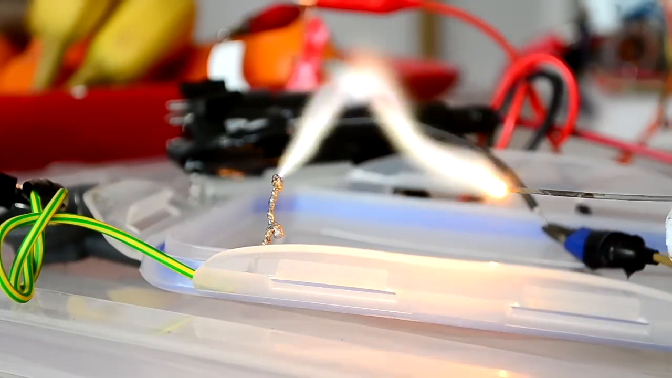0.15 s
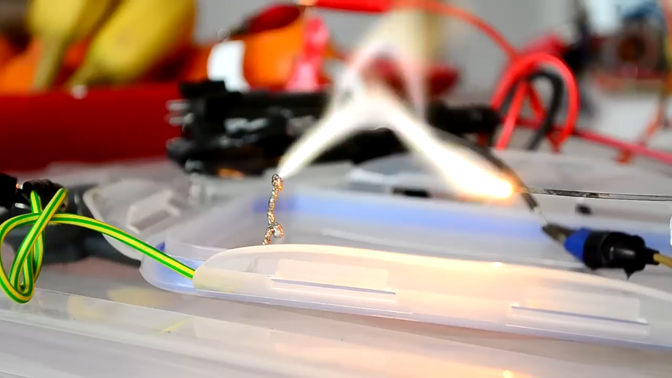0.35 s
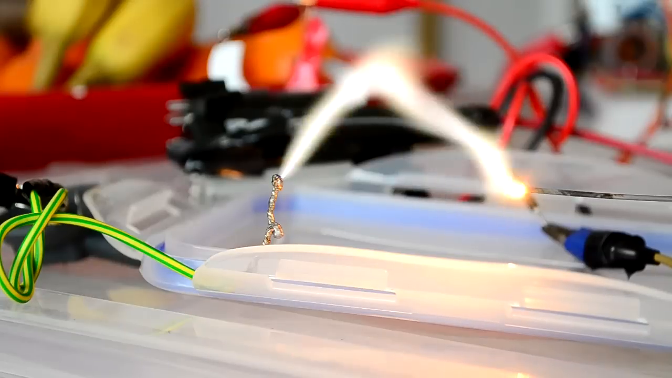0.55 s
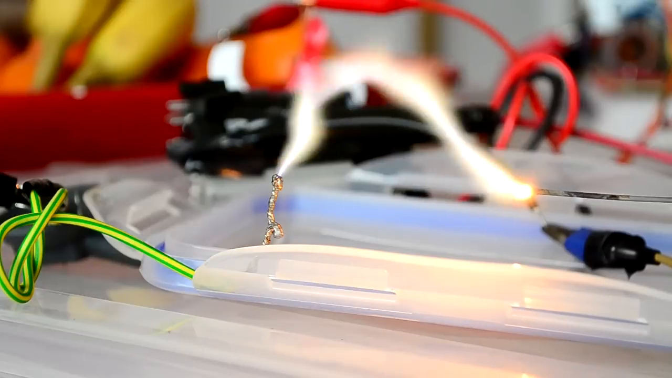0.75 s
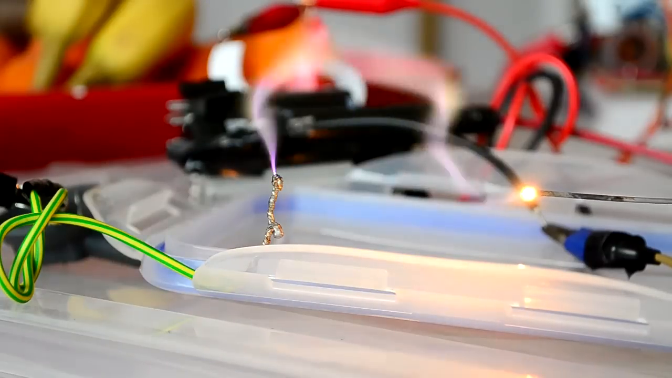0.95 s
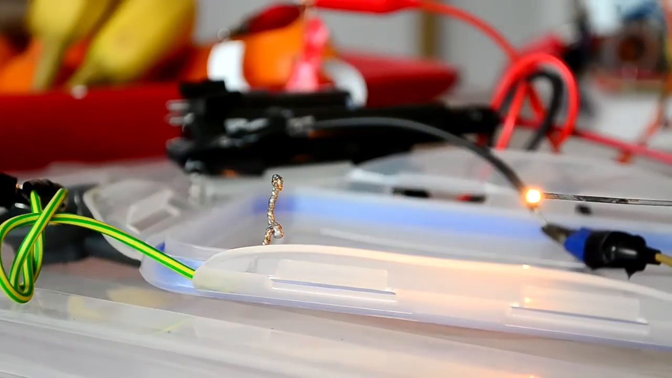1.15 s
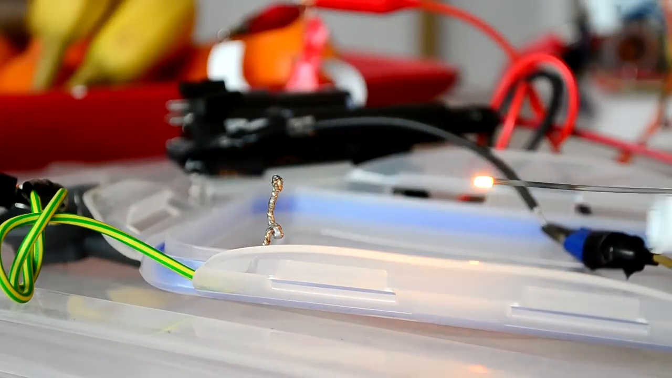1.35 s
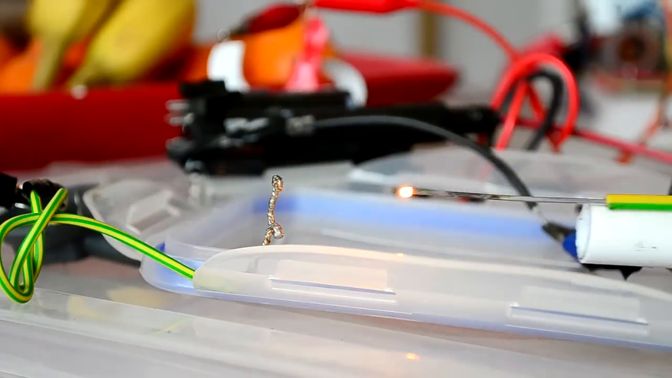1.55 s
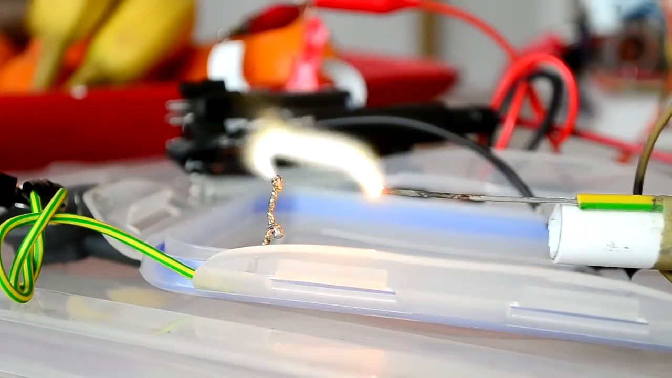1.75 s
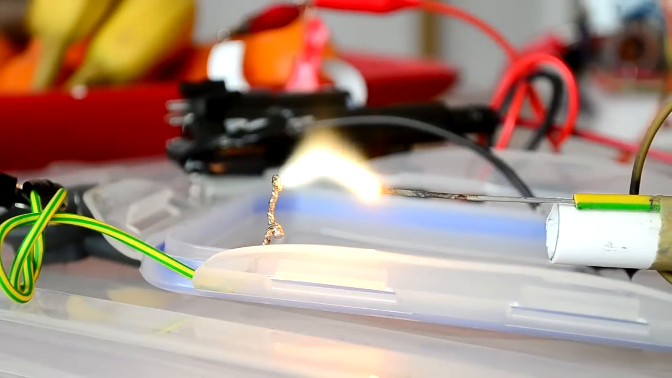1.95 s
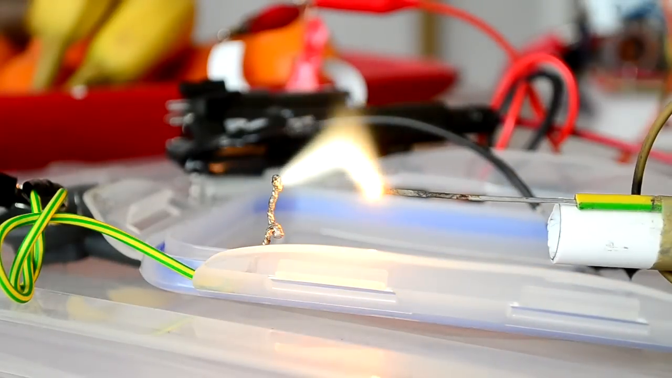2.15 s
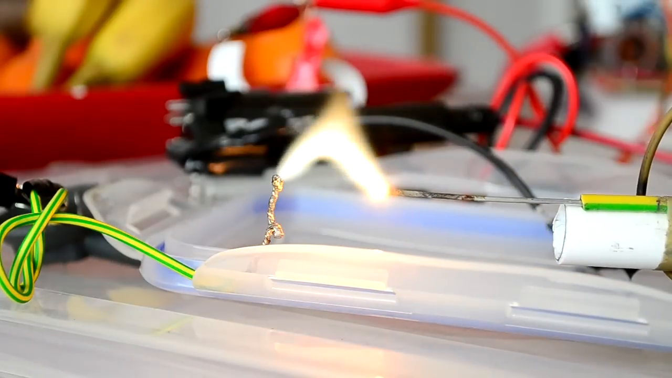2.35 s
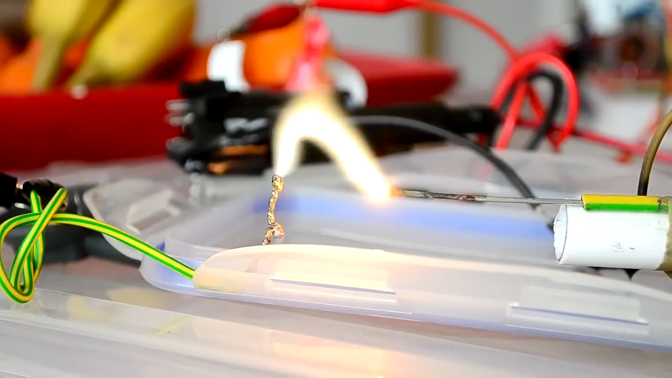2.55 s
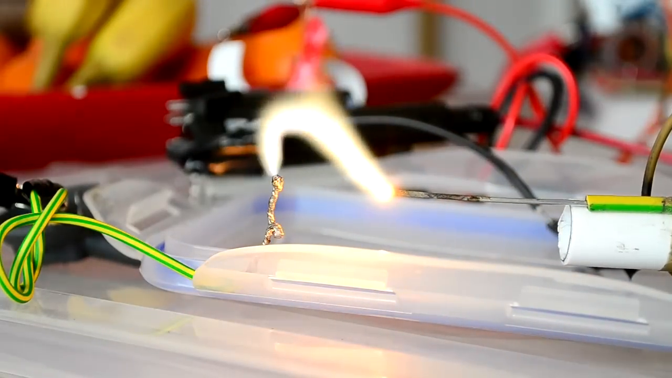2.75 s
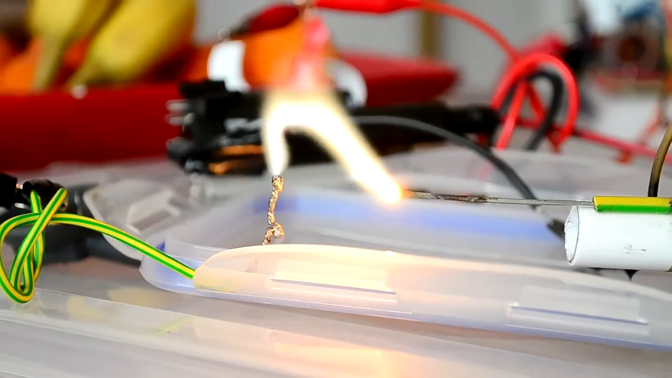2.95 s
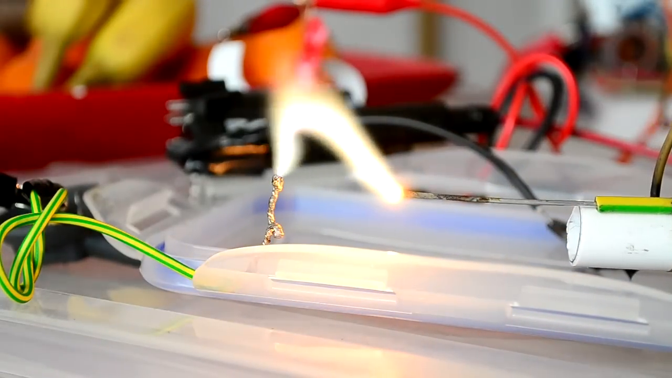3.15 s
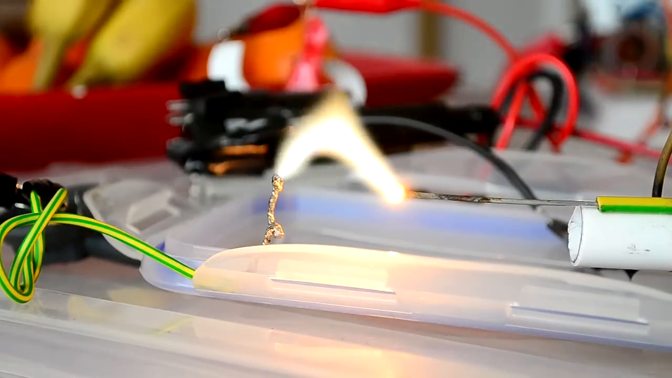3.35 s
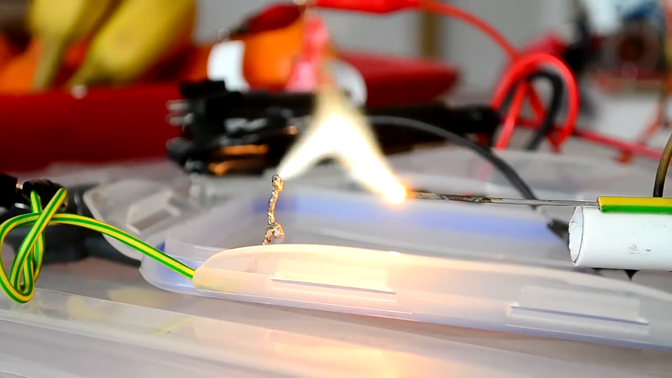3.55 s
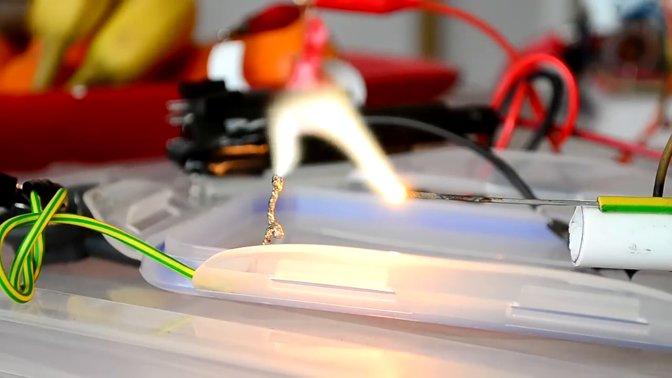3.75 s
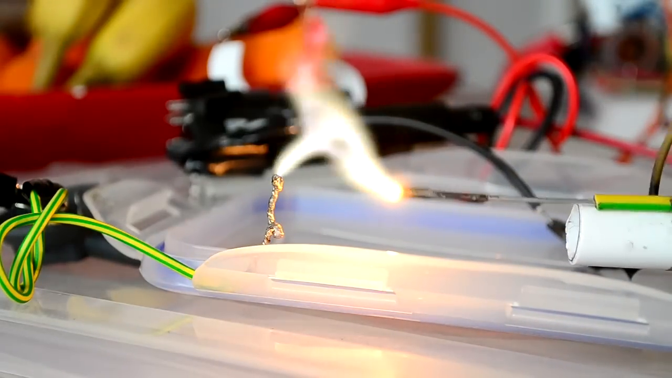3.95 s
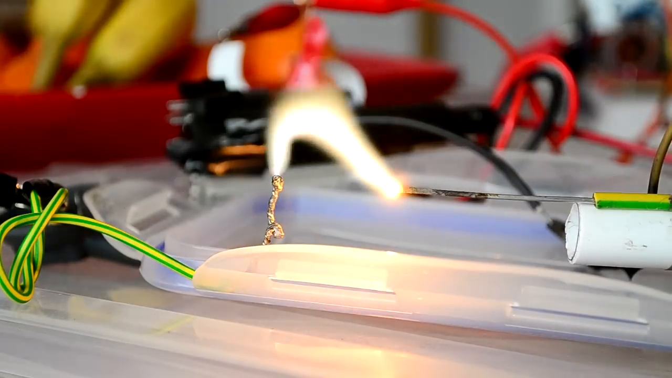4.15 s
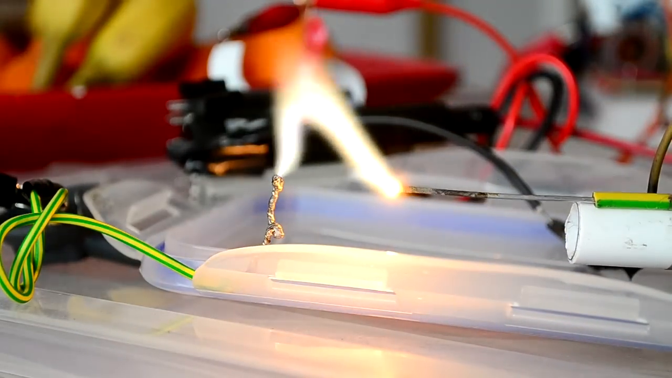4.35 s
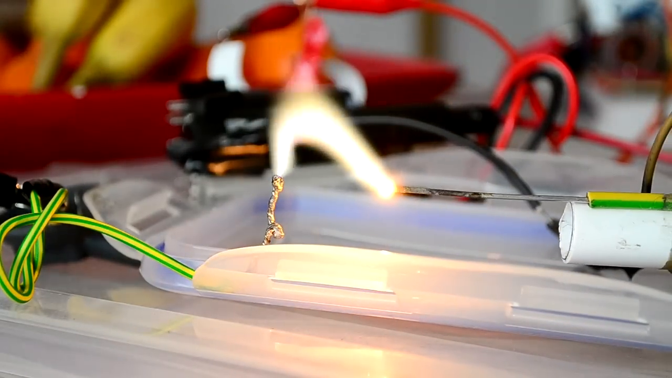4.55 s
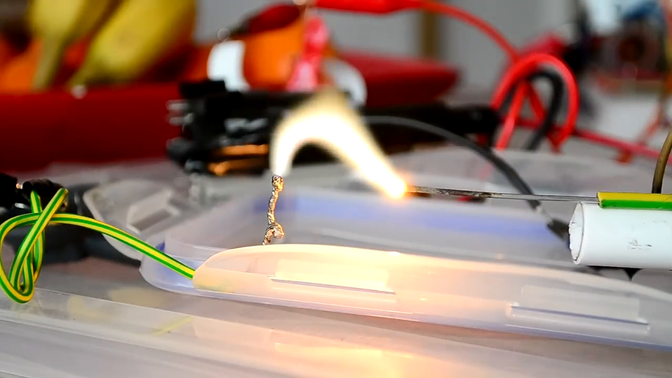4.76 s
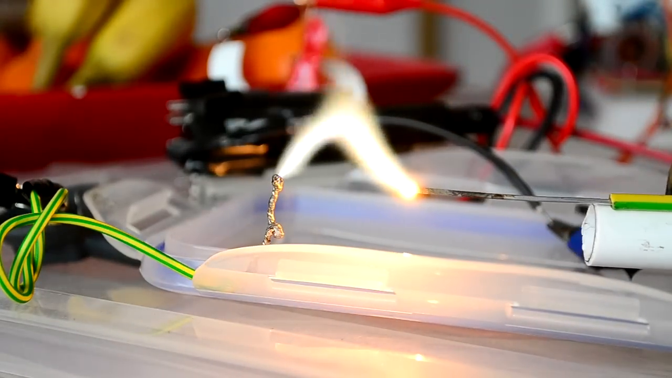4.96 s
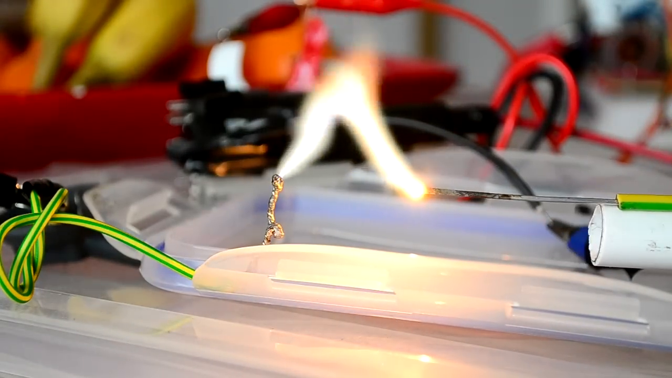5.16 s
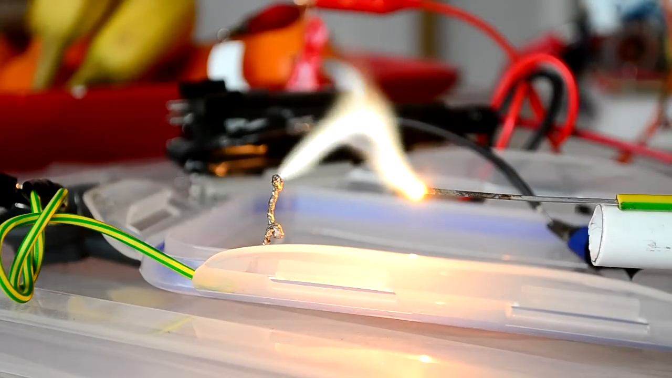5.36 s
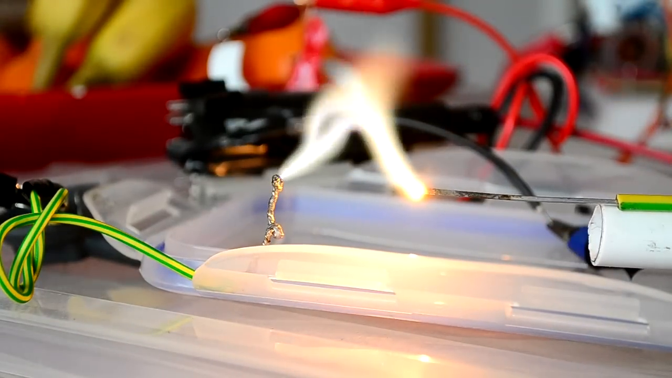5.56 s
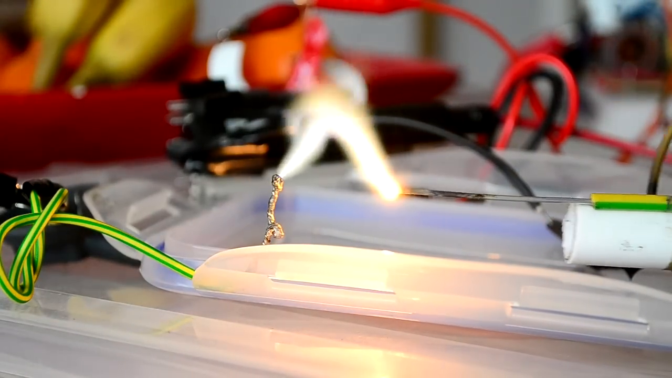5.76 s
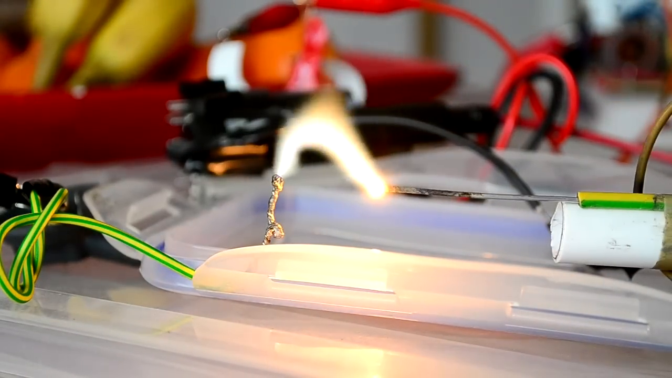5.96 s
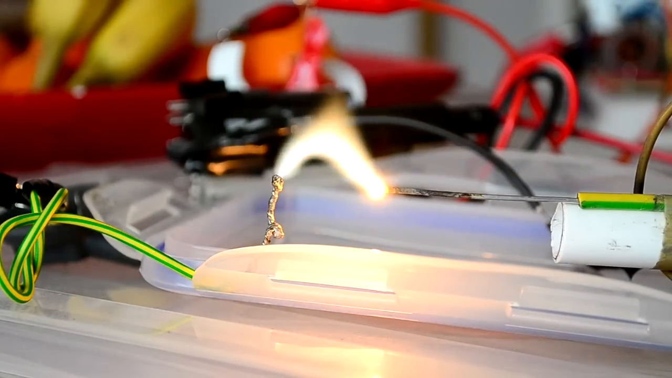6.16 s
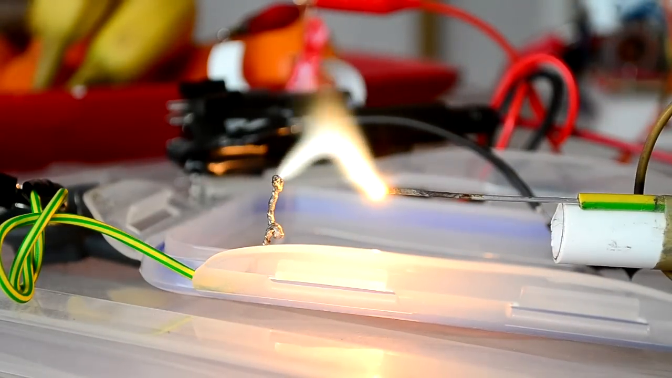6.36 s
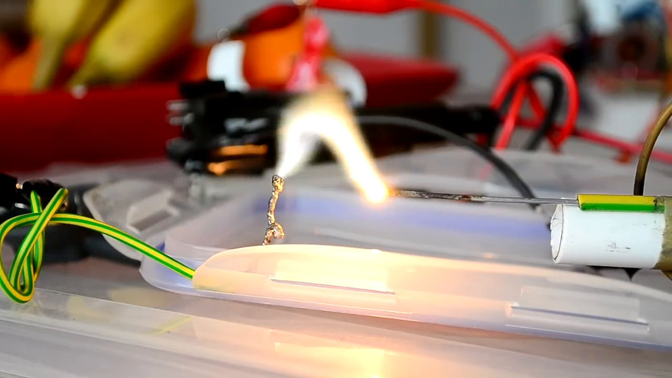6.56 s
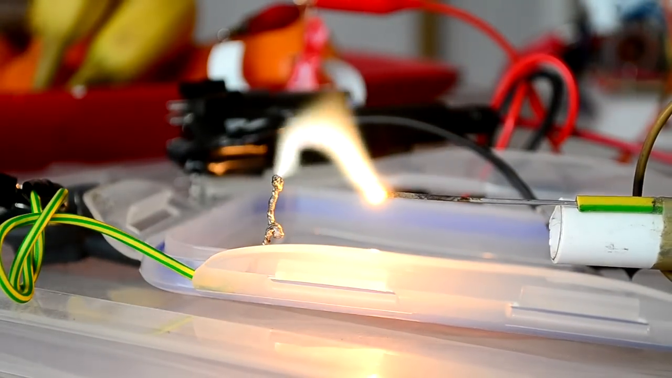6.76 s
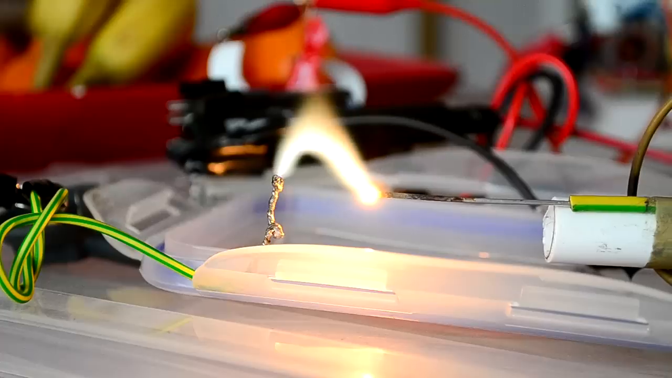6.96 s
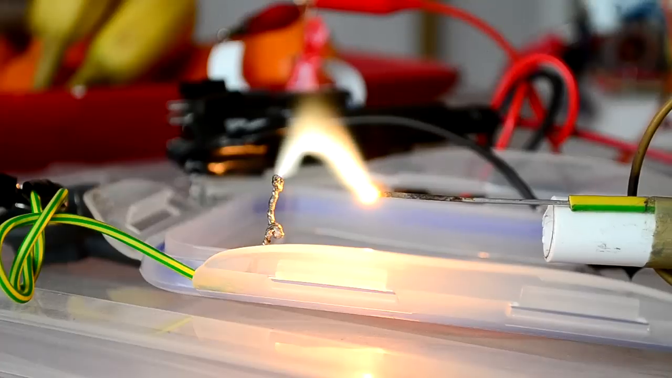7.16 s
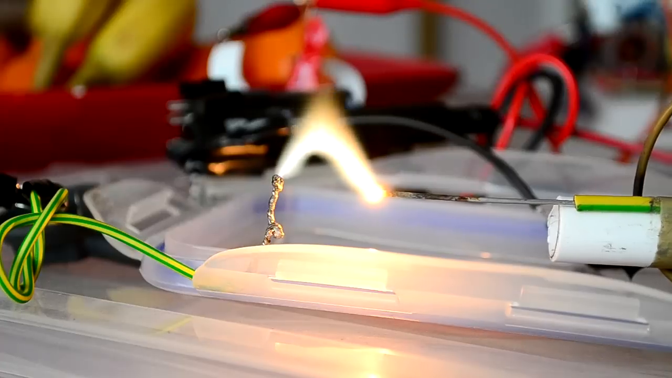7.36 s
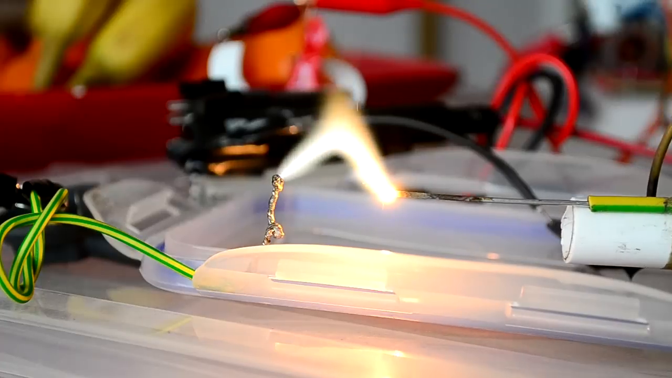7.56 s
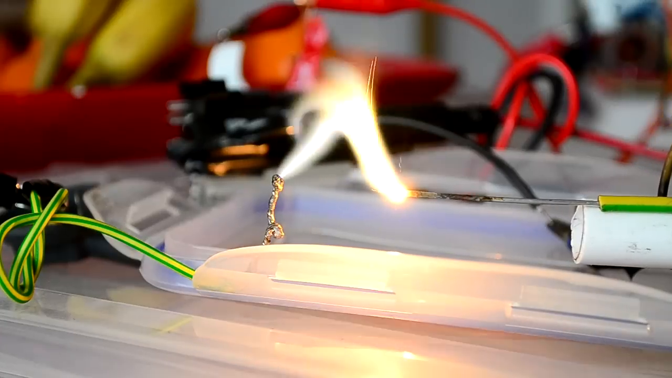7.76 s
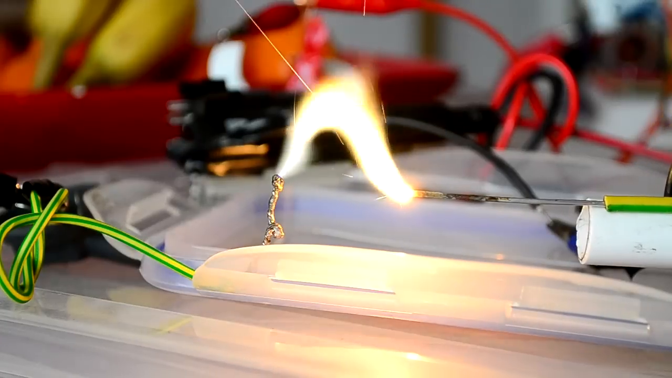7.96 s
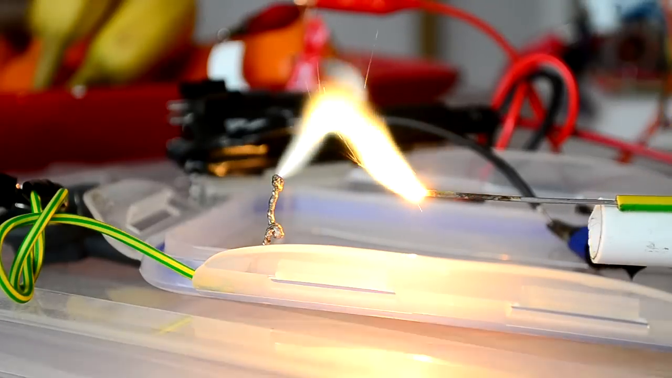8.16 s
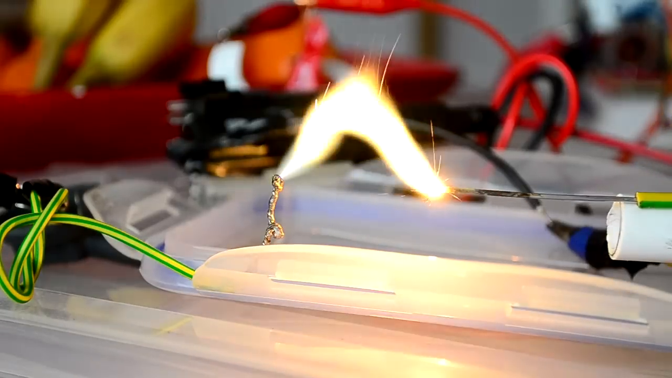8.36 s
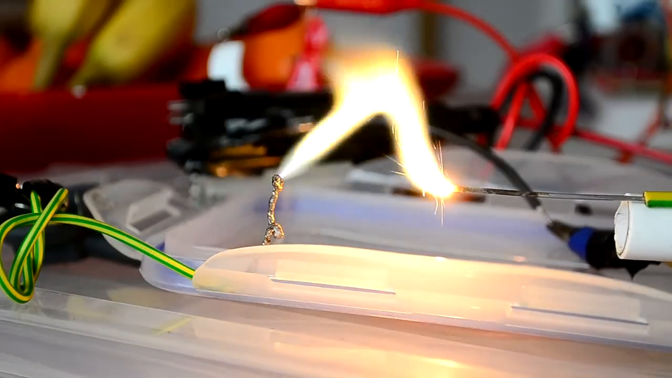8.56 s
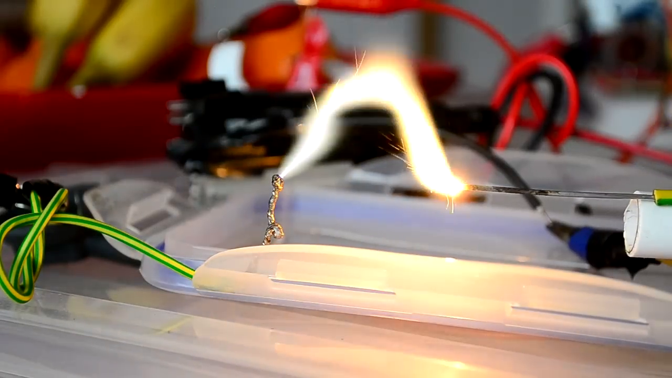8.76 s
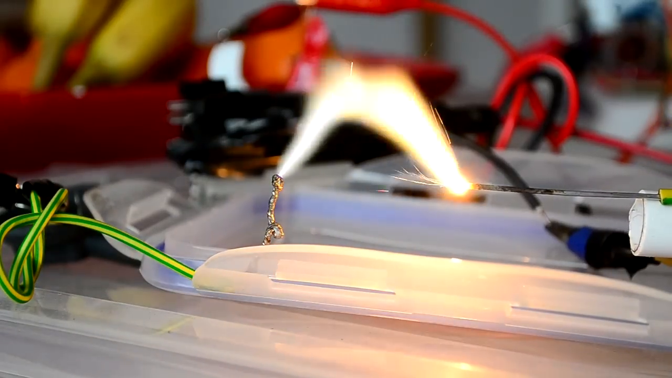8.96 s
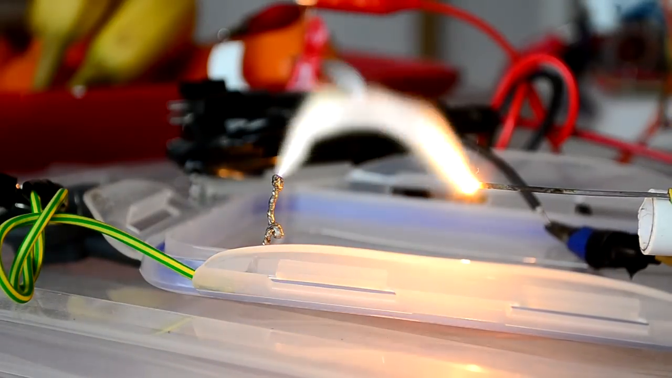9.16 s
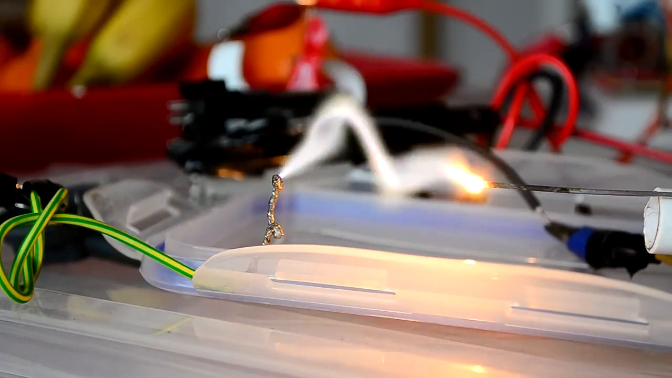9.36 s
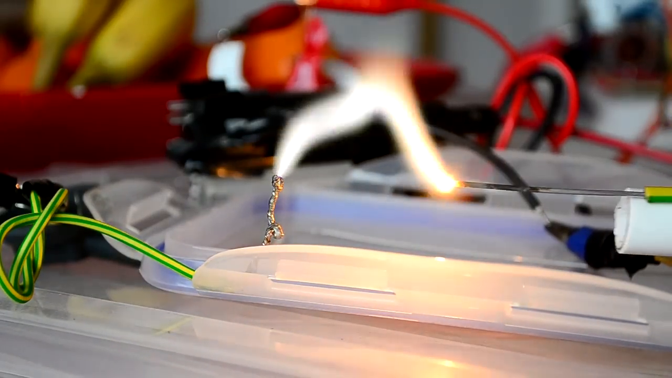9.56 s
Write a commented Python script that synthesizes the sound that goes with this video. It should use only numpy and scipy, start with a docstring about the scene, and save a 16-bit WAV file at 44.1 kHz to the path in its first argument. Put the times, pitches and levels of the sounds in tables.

```python
"""A high-voltage arc burns between two wires on a workshop bench, close to a small microphone.
The arc climbs, then strikes again on a shorter path, heating the air in a flash: a dull pop.
Thin sparks tick at the hot wire tip, and between them the flame, a swarm of tiny discharges,
flutters and hisses. The bench and walls echo it all over a steady room murmur."""
import sys
import numpy as np
from scipy import signal
from scipy.fft import rfft, irfft
from scipy.io import wavfile
from scipy.ndimage import uniform_filter1d

SR = 44100
rng = np.random.default_rng(int(sys.argv[2]) if len(sys.argv) > 2 else 0)


def master_out(mix):
    """Clip the mix to full scale and print it as 16-bit PCM to the path in sys.argv[1]."""
    frames = np.transpose(np.atleast_2d(mix))
    ceiling = np.clip(frames, -1, 1)
    pcm = np.round(ceiling * 32767).astype(np.int16)
    wavfile.write(sys.argv[1], SR, pcm)


N = 423801


def amp(db):
    return 10 ** (np.asarray(db) / 20)


def unit_rms(x):
    return x / np.sqrt(np.mean(x ** 2) + 1e-20)


def curve_at(points, hz):
    point_hz, value = np.transpose(points)
    return np.interp(np.log(hz + 1), np.log(point_hz + 1), value)


def add(mix, start_s, sound):
    part = mix[round(start_s * SR):][:len(sound)]
    part += sound[:len(part)]


def click_of(spectrum, size=2048):
    """A short click with this spectrum; convolving a sound with it gives the sound that tone."""
    log_gain = np.log(amp(curve_at(spectrum, abs(np.fft.fftfreq(size, 1 / SR)))))
    return np.fft.ifft(np.exp(np.conj(signal.hilbert(log_gain)))).real[:size // 2]


# The tone of the room noise: (frequency [Hz], relative level [dB])
MURMUR_SPECTRUM = [(15, -40), (25, -21.5), (161, -9), (323, -9.5), (395, -7), (532, -18.5), (573, -1),
                   (633, -5.5), (832, -13), (2480, -13.5), (9500, -38), (12400, -64.5), (20900, -120)]
# The tones of the power supply: (frequency [Hz], level [dB])
SUPPLY_TONES = [(49.5, -77.5), (570, -82), (602, -74), (9000, -80)]


def room_murmur(noise_db=-61.5):
    """Steady room noise with the faint hum of the power supply."""
    gain = amp(curve_at(MURMUR_SPECTRUM, np.fft.rfftfreq(N, 1 / SR)))
    noise = irfft(rfft(rng.standard_normal(N)) * gain, N)
    t = np.arange(N) / SR
    hum = sum(np.sqrt(2) * amp(db) * np.sin(2 * np.pi * (hz * t + rng.random()))
              for hz, db in SUPPLY_TONES)
    return amp(noise_db) * unit_rms(noise) + hum


# Single echoes from the bench and near walls: (delay [ms], level [dB])
NEAR_ECHOES = [(2.35, -18), (4.4, -22), (5.4, -19), (6.2, -17), (10.3, -19), (11.5, -21)]
# How long the room rings: (frequency [Hz], time to fade by 60 dB [s])
ROOM_FADE = [(200, 0.38), (600, 0.36), (1400, 0.33), (3700, 0.54), (8000, 0.25), (11000, 0.28)]


def room_echoes(sound, tail_db=-5.5, build_up_s=0.0061):
    """The bench and walls throw sound back: a few clear echoes and a fading tail of many more."""
    taps = np.zeros(SR)
    slots = np.arange(100, SR - 20, 20)  # one reflection somewhere in every 20 samples
    taps[slots + rng.integers(0, 20, len(slots))] = rng.choice([-1., 1.], len(slots))
    hz, t, bands = signal.stft(taps, SR, nperseg=256)
    fade = amp(-60 * t / curve_at(ROOM_FADE, hz)[:, None])
    tail = signal.istft(bands * fade, SR, nperseg=256)[1]
    tail *= 1 - np.exp(-np.arange(len(tail)) / SR / build_up_s)
    response = amp(tail_db) * tail / np.linalg.norm(tail)
    for ms, db in NEAR_ECHOES:
        add(response, ms / 1000, amp([db]))
    return signal.fftconvolve(sound, response)[:N]


# How loud the flame is: (time [s], flutter level [dB], sizzle level [dB])
FLAME_LEVELS = [(0, -58.5, -51), (.95, -54.5, -76), (1.12, -62.5, -56), (1.44, -56, -56),
                (1.5, -57.5, -52.5), (1.7, -56.5, -57), (2.0, -58.5, -80.5), (3.3, -58.5, -95),
                (4.1, -57, -90), (4.8, -56, -68), (5.8, -59, -80), (7.1, -60, -86), (7.85, -58.5, -63),
                (7.95, -58, -64), (9.0, -56.5, -71), (9.2, -57.5, -68), (9.61, -59, -66)]
# The tone of the low flutter and of the high sizzle: (frequency [Hz], relative level [dB])
FLUTTER_SPECTRUM = [(100, -17.5), (300, -2), (700, -1.5), (1500, -5), (3000, -12.5), (6000, -21.5)]
SIZZLE_SPECTRUM = [(2500, -21.5), (5000, -13.5), (7000, -6), (8000, 0.5), (9200, 2), (11000, -2.5)]


def flame(size_spread_db=1.5, flicker_db=1.7):
    """A swarm of tiny discharges of uneven size: slow ones flutter, fast ones sizzle."""
    times, flutter_db, sizzle_db = np.transpose(FLAME_LEVELS)
    t, out = np.arange(N) / SR, np.zeros(N)
    for spectrum, db, per_s in ((FLUTTER_SPECTRUM, flutter_db, 4000), (SIZZLE_SPECTRUM, sizzle_db, 8000)):
        sizes = amp(size_spread_db * np.minimum(rng.exponential(1, N), 6))
        fires = rng.random(N) < per_s / SR
        swarm = signal.oaconvolve(sizes * fires * rng.choice([-1, 1], N), click_of(spectrum))[:N]
        flicker = unit_rms(uniform_filter1d(uniform_filter1d(rng.standard_normal(N), 600), 600))
        out += amp(np.interp(t, times, db) + flicker_db * flicker) * unit_rms(swarm)
    return out


# The fading tail of a spark at the very start, short hisses, and the bright ring of the loudest snap:
# (time [s], rise and fall time [ms], hold time [ms], band level [dB], filter centre [Hz],
# filter width [Hz], sizzle level [dB])
NOISE_BURSTS = [(0, 0.8, 40, -46.5, 3000, 5100, -70), (1.285, 10.5, 74, -58, 8040, 60.4, -80),
                (1.592, 3.8, 5.5, -38.5, 905, 884, -52.5), (1.6, 4.3, 23, -46.5, 1300, 1245, -67.5),
                (1.7305, 0.26, 4, -40, 2200, 2540, -22), (1.736, 1, 14, -52, 7060, 696, -54),
                (1.7506, 1.8, 9.7, -33, 2530, 2050, -15.5), (1.7623, .3, .8, -7.5, 9200, 1000, -40),
                (4.208, 1.7, 41, -48.5, 3260, 1980, -52), (4.209, 1.8, 36, -47.5, 1100, 1210, -80),
                (4.355, 14, 54, -42.5, 3880, 2560, -69), (4.366, 8, 36, -39.5, 3700, 600, -80)]


def noise_bursts():
    """A band of noise and a high sizzle swell together, hold and fall away."""
    out, length = np.zeros(N), SR // 8
    t_ms = 1000 * np.arange(length) / SR
    for start_s, rise_ms, hold_ms, db, hz, width_hz, sizzle_db in NOISE_BURSTS:
        peak = signal.iirpeak(hz, hz / width_hz, SR)
        # Both noises are reversed, so the burst does not begin with the filters still warming up.
        band = signal.lfilter(*peak, signal.lfilter(*peak, rng.standard_normal(length)))[::-1]
        sizzle = signal.oaconvolve(rng.standard_normal(length), click_of(SIZZLE_SPECTRUM))[:length][::-1]
        swell = np.interp(t_ms, np.cumsum([0, rise_ms, hold_ms, rise_ms]), [0, 1, 0.9, 0.014])
        on = swell > 0
        burst = amp(db) * unit_rms(band[on]) + amp(sizzle_db) * unit_rms(sizzle[on])
        add(out, start_s, burst * swell[on])
    return out


# Spells of small sparks: (start [s], end [s], rate [sparks per s], usual treble peak [dB])
SPITTING_SPELLS = [(5.9, 6.05, 31, -37), (6.29, 6.51, 32, -39), (7.29, 7.9, 21, -41.5),
                   (7.92, 8.34, 63, -31), (8.336, 8.8, 70, -31.5), (8.8, 9.13, 80, -28),
                   (9.191, 9.5, 28, -33)]


def spitting_sparks(slot_s=0.005, spread_db=3.5, body_db=-17, body_spread_db=4):
    """The hot wire tip spits at random, at most once a time slot. Returns rows for spark_ticks."""
    slots = np.arange(0, N / SR, slot_s)
    when, chance = rng.random((len(slots), 2)).T
    size, body = rng.standard_normal((len(slots), 2)).T
    times, rows = slots + slot_s * when, []
    for start, end, per_s, db in SPITTING_SPELLS:
        fires = (times > start) & (times < end) & (chance < per_s * slot_s)
        sparks = np.transpose([times, db + spread_db * size, body_db + body_spread_db * body])
        rows += list(sparks[fires])
    return rows


# Thin sparks that stand out: (time [s], treble peak [dB], body level relative to the treble [dB])
CLEAR_SPARKS = [(0.0014, -28.5, -1), (0.1084, -12.5, -3), (0.2128, -26.5, 4), (0.2644, -27, -1),
                (0.3161, -27, -19), (0.3204, -12, -6), (0.4348, -25, 2), (0.4784, -32, -14),
                (0.5418, -33, -12), (0.5576, -16, 1), (0.5725, -25, -11), (0.6784, -15, -0.5),
                (0.692, -25, -21), (0.7034, -14, -5), (0.7613, -30.5, 5.5), (0.7692, -24, -10),
                (0.8725, -32.5, 2), (0.88, -25, -4), (0.9285, -26, -9), (0.9326, -21.5, -22),
                (0.939, -29, 0), (0.9437, -16, -2.5), (1.0442, -23.5, -25), (1.5946, -38.5, 3.5),
                (1.7627, -6.5, -25), (1.8751, -17.5, -20), (2.7182, -31.5, -21), (2.9018, -25.5, 0),
                (3.0297, -31, -16), (3.1304, -17, -2), (3.1915, -25.5, -1), (3.3234, -24.5, -5.5),
                (3.6225, -40, -14), (3.9793, -34.5, -23), (4.1111, -30.5, -6.5), (4.353, -22.5, 1.5),
                (4.385, -16, -20), (4.443, -30, -13), (4.5926, -24.5, -6.5), (4.6071, -30, 2),
                (4.7408, -29.5, -0.5), (4.7526, -32, -9), (4.8108, -35.5, -7), (4.8804, -31.5, -5),
                (5.0141, -33, 2), (5.0906, -25, -1), (5.1597, -31.5, -9), (5.2092, -31.5, -17),
                (5.2466, -33, -8), (5.2528, -28.5, -21), (5.3755, -35.5, -28), (5.4071, -37, 3),
                (5.4867, -30, -14), (5.646, -38, 2.5), (5.7259, -35, -22), (5.774, -39, 7),
                (5.8595, -35, -20), (5.8731, -35.5, -12), (5.9248, -36, -13), (5.9446, -39, -19),
                (5.9733, -32.5, -19), (6.0575, -32, -19), (6.2124, -38, -24), (6.3404, -33, -19),
                (6.3819, -35.5, -17), (6.405, -30.5, -15), (6.4687, -34, -18), (6.5067, -33.5, -19),
                (6.651, -27.5, -20), (6.809, -35.5, -15), (6.82, -35, -18), (6.9986, -36.5, -20),
                (7.228, -38, -6.5), (7.2867, -25.5, -16), (7.375, -42, -16), (7.4499, -32.5, -16),
                (7.4597, -35, -12), (7.5145, -35.5, -18), (7.5552, -30.5, -14), (7.5836, -32.5, -14),
                (7.6168, -32, -13), (7.665, -31.5, -14), (7.7302, -36.5, -13), (7.7566, -30, -12),
                (7.7967, -28, -10), (7.9165, -26.5, -6), (7.9273, -24, -14), (7.9383, -29, -19),
                (7.962, -35, -23), (8.0012, -29, -11), (8.0333, -22, -12), (8.0405, -29.5, -1),
                (8.0976, -29, -18), (8.1354, -26, -9), (8.1827, -28.5, -5.5), (8.2165, -24.5, -4.5),
                (8.2461, -25.5, -11), (8.2881, -27, -13), (8.3522, -29.5, -9), (8.3717, -26, -11),
                (8.403, -20, -13), (8.4134, -22, -13), (8.4402, -29, -5), (8.4586, -27, -22),
                (8.4933, -37, -12), (8.5108, -23, -11), (8.559, -27.5, -21), (8.565, -32, -3),
                (8.6043, -23.5, -11), (8.6552, -25, -26), (8.689, -28.5, -15), (8.7186, -20.5, -7.5),
                (8.7595, -26, -22), (8.7816, -34, -13), (8.7914, -30, 10.5), (8.7937, -23, -15),
                (8.8366, -20, -10), (8.8688, -22, -10), (8.8989, -19, -9), (8.9244, -28, -19),
                (8.9567, -21, -11), (8.988, -18, -20), (9.0046, -24.5, 1.5), (9.022, -27, -7),
                (9.0605, -19, -12), (9.0867, -21.5, -2), (9.1175, -28.5, 1), (9.172, -26, -4),
                (9.1957, -33, 2), (9.2826, -27, 8.5), (9.295, -28, -21), (9.3149, -27, -0.5),
                (9.3769, -27.5, -21), (9.4204, -31, 1.5), (9.4345, -25.5, -2), (9.4483, -37, -16),
                (9.4872, -40, -17), (9.5471, -19, -2.5), (9.5851, -23.5, 4)]
# The tone of a tick's bright treble and of its lower body: (frequency [Hz], relative level [dB])
TICK_TREBLE = [(1500, -53), (4200, -16.5), (5200, -4.5), (6300, -3), (8000, 0), (9500, 5), (10800, -3.5),
               (12000, -9)]
TICK_BODY = [(300, -17.5), (1200, 0.5), (2500, 1), (4500, -1.5), (7000, -31.5), (12000, -32.5)]


def spark_ticks(sparks, scatter_s=0.0013, after_click_gain=0.45):
    """Each spark is one sharp click with five weaker ones of random sign just after it."""
    times, treble_db, body_db = np.transpose(sparks)
    when, size = rng.random((len(times), 6, 2)).T
    when[0] = 0  # the main click comes right on time
    at = np.minimum(np.round((times + scatter_s * when) * SR).astype(int), N - 1)
    after_clicks = after_click_gain * (2 * size[1:] - 1) * (1 - when[1:])
    strengths = np.vstack([np.ones(len(times)), after_clicks])
    out = np.zeros(N)
    for spectrum, db in ((TICK_TREBLE, treble_db), (TICK_BODY, treble_db + body_db)):
        click = click_of(spectrum)
        heard_peak = abs(signal.hilbert(np.convolve(click, click_of(OVERALL_TONE)))).max()
        spikes = np.bincount(at.ravel(), (amp(db) * strengths).ravel(), N)
        out += signal.oaconvolve(spikes, click / heard_peak)[:N]
    return out


# The arc strikes again on a shorter path: (time [s], relative level [dB], length of the push [ms])
ARC_STRIKES = [(0.0322, -33, 0.32), (0.143, -23, 0.2), (0.2133, -30.5, 0.34), (0.24, -31, 0.25),
               (0.3166, -23, 0.27), (0.3203, -37, 0.46), (0.4782, -22, 0.16), (0.542, -23.5, 0.26),
               (0.5719, -19, 0.25), (0.6914, -18.5, 0.21), (0.7019, -22, 0.17), (0.7616, -30.5, 0.36),
               (0.8704, -26, 0.34), (0.9308, -14, 0.29), (0.944, -19, 0.2), (1.0444, -8.5, 0.29),
               (1.7628, -4.5, 0.26), (1.858, -39, 0.36), (1.8757, -23, 0.29), (2.6644, -35.5, 0.43),
               (2.9023, -29.5, 0.6), (2.9604, -33.0, 0.54), (3.031, -33, 0.5), (3.1302, -28, 0.68),
               (3.1654, -31, 0.6), (3.192, -28, 0.51), (3.2566, -30.0, 0.41), (3.3233, -17.5, 0.18),
               (3.3427, -29, 0.55), (3.4158, -32, 0.49), (3.4985, -35.5, 0.6), (3.6213, -28.5, 0.3),
               (3.724, -33.0, 0.52), (3.797, -36, 0.59), (3.8753, -28, 0.36), (3.9314, -33.5, 0.49),
               (4.0498, -34, 0.54), (4.209, -33.5, 0.53), (4.2818, -33.5, 0.54), (4.3219, -28.5, 0.51),
               (4.3535, -29, 0.54), (4.385, -14.5, 0.15), (4.5932, -29, 0.66), (4.6088, -35, 0.78),
               (4.7398, -21, 0.27), (4.811, -26, 0.28), (4.8802, -16, 0.25), (4.9404, -28.5, 0.38),
               (4.9493, -28, 0.39), (5.0146, -25, 0.34), (5.0905, -29.5, 0.5), (5.166, -29.5, 0.45),
               (5.3274, -27, 0.29), (5.4076, -27, 0.4), (5.4878, -37.5, 0.67), (5.5682, -31.5, 0.44),
               (5.6468, -31.5, 0.56), (5.7076, -32, 0.52), (5.7753, -31, 0.59), (5.81, -33, 0.52),
               (5.8404, -30.5, 0.38), (5.9986, -31.5, 0.35), (6.0677, -30, 0.37), (6.1394, -29.5, 0.38),
               (6.209, -30, 0.41), (6.286, -30.5, 0.34), (6.3577, -30.5, 0.39), (6.434, -31.5, 0.34),
               (6.5078, -29.5, 0.34), (6.5815, -30, 0.37), (6.653, -38, 0.54), (6.7233, -30.5, 0.39),
               (6.7955, -29, 0.34), (6.8662, -30, 0.37), (7.7709, -30, 0.42), (7.8422, -26.5, 0.31),
               (7.9172, -30, 0.54), (7.9892, -30.5, 0.44), (8.0638, -29.5, 0.43), (8.1326, -28, 0.57),
               (8.2113, -26.5, 0.42), (8.287, -25.5, 0.32), (8.2961, -30.5, 0.39), (8.3355, -29, 0.56),
               (8.369, -26.5, 0.28), (8.4086, -28, 0.33), (8.414, -27.5, 0.49), (8.4595, -32, 0.39),
               (8.58, -27, 0.36), (8.6668, -29, 0.32), (8.7294, -28.5, 0.46), (8.7914, -30, 0.47),
               (8.873, -20.5, 0.21), (8.902, -28, 0.32), (8.966, -22.5, 0.23), (8.988, -16, 0.16),
               (9.0298, -31.5, 0.43), (9.1238, -35.5, 0.55), (9.2224, -21.5, 0.26), (9.2829, -19.5, 0.16),
               (9.3243, -29, 0.18), (9.416, -33, 0.47), (9.6079, -26, 0.34)]


def arc_pops(gain_db=-5.5):
    """Each strike heats the air in a flash: a push of pressure, then a longer and weaker pull."""
    out = np.zeros(N)
    for time_s, db, push_ms in ARC_STRIKES:
        push_s = push_ms / 1000
        u = 4 * np.arange(400) / (push_s * SR)  # scaled time: push turns to pull at u = 4
        pressure = (4 - u) * u ** 3 * np.exp(-u)  # the slope of the heat curve u^4 exp(-u)
        add(out, time_s - push_s, amp(db + gain_db) * pressure)
    return out


def scene():
    """The arc, its echoes and the room murmur, in one channel."""
    arc = spark_ticks(CLEAR_SPARKS + spitting_sparks()) + arc_pops() + noise_bursts() + flame()
    return (arc + room_echoes(arc) + room_murmur())[None]


# The overall tone of the sound, with a faint airy top on the ticks: (frequency [Hz], gain [dB])
OVERALL_TONE = [(15, -12.5), (150, 0.5), (3600, -2.5), (6300, 0.5), (7500, -1.5), (7900, -7.5), (8300, -4),
                (9300, -5), (10300, -11), (11300, -20), (11800, -21.5), (13000, -7.5)]


def record(dry):
    """Give the sound its overall tone, then turn the highest treble far down."""
    coloured = signal.oaconvolve(dry, click_of(OVERALL_TONE)[None])[:, :N]
    low_pass = signal.firwin(127, cutoff=11520, window=("kaiser", 1.5), fs=SR)
    return signal.oaconvolve(coloured, low_pass[None], "same")


dry = scene()
out = record(dry)
master_out(out)
```